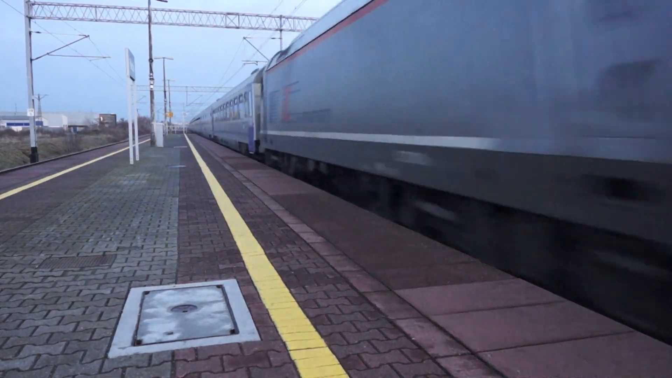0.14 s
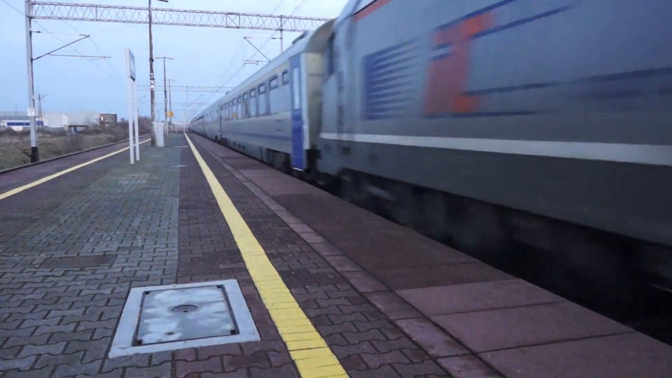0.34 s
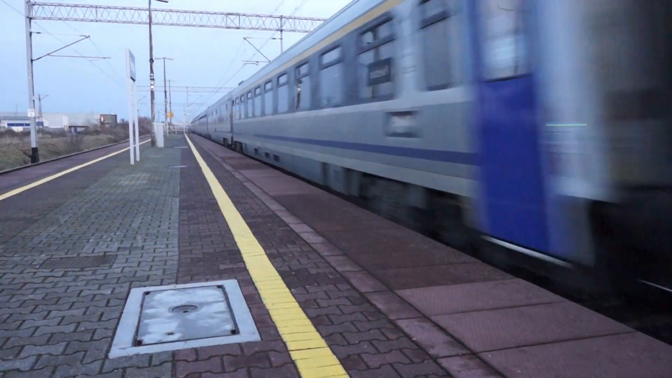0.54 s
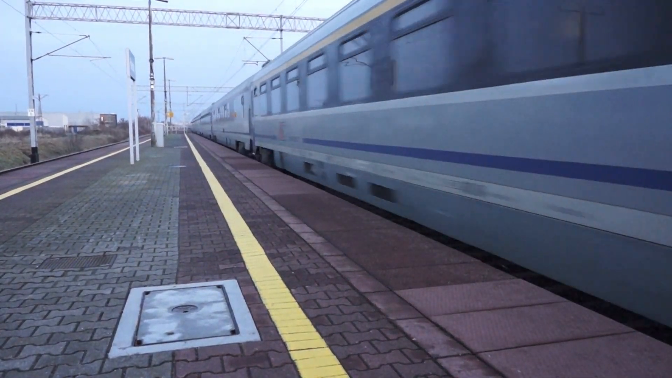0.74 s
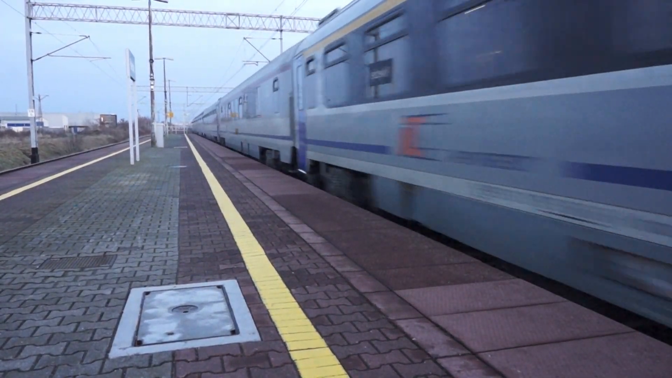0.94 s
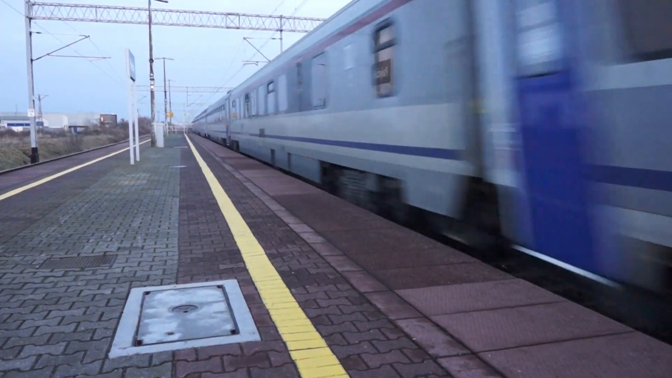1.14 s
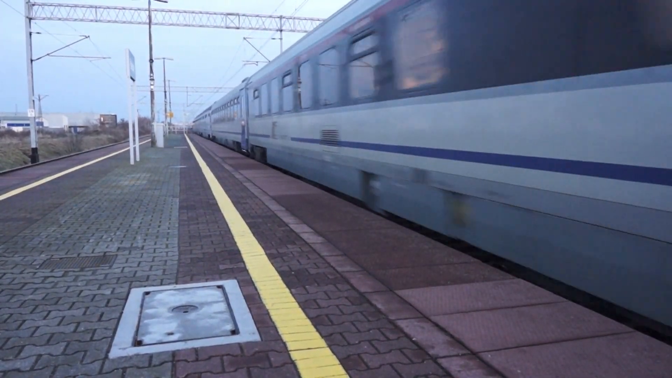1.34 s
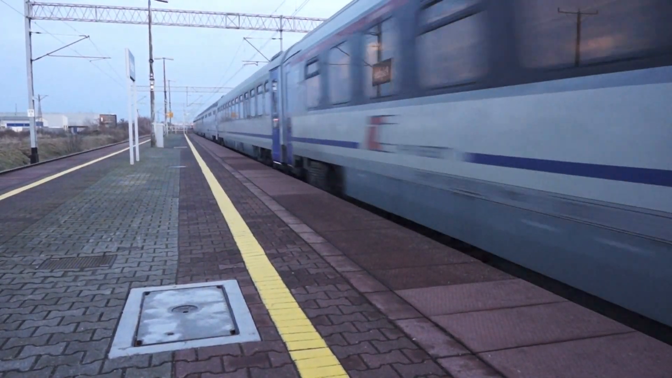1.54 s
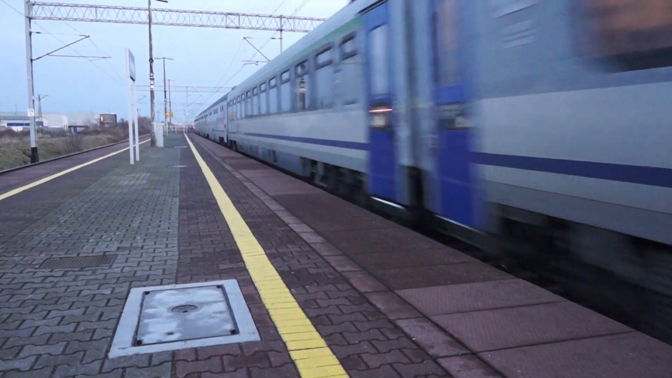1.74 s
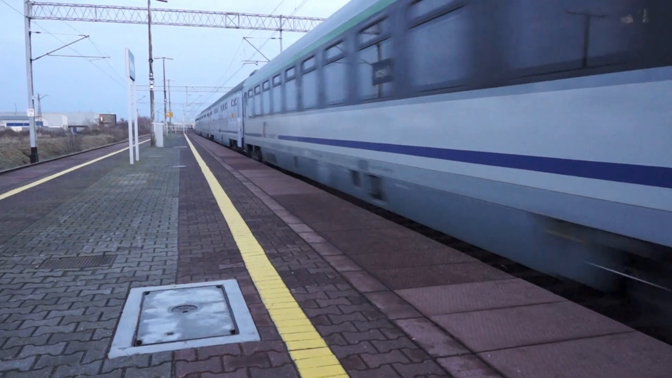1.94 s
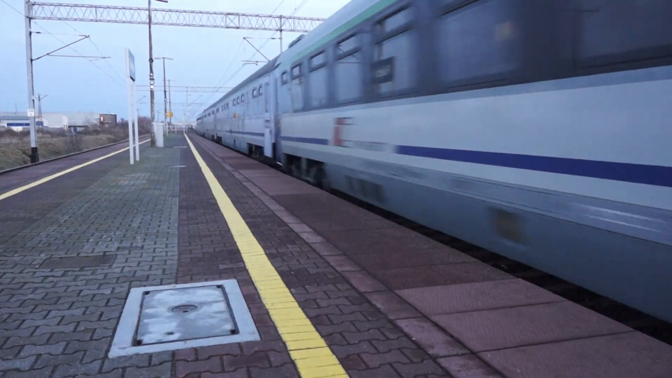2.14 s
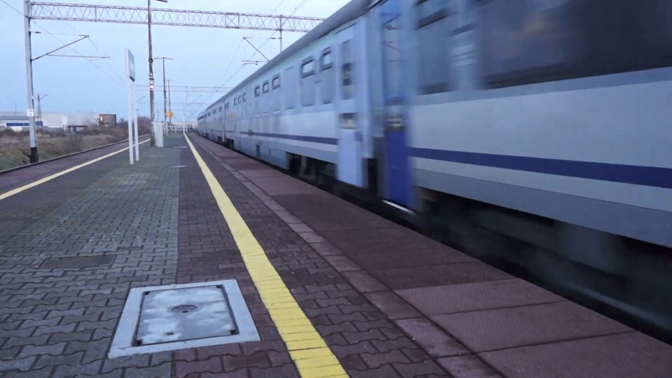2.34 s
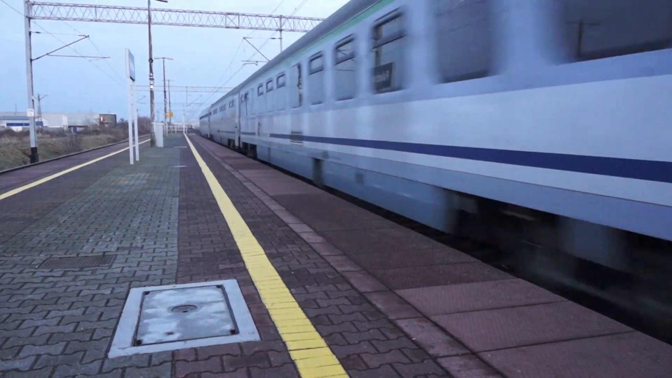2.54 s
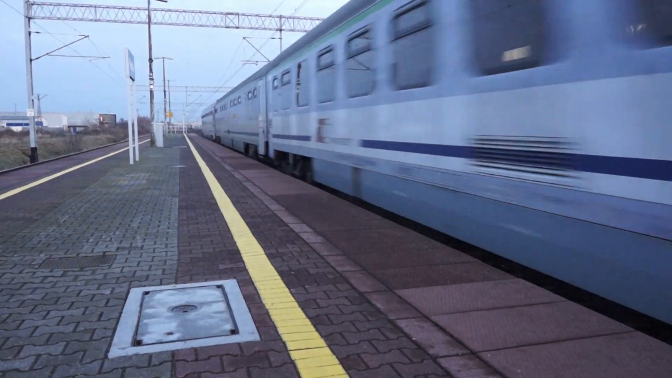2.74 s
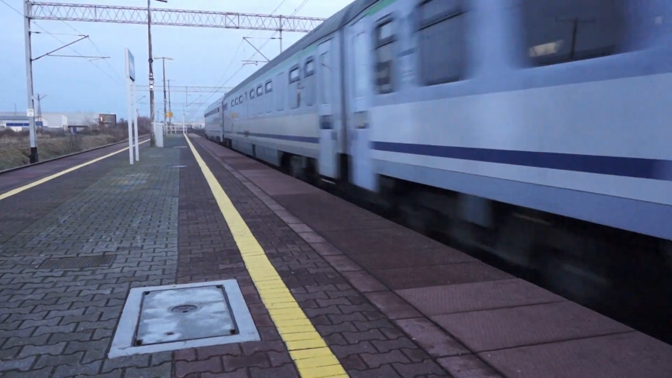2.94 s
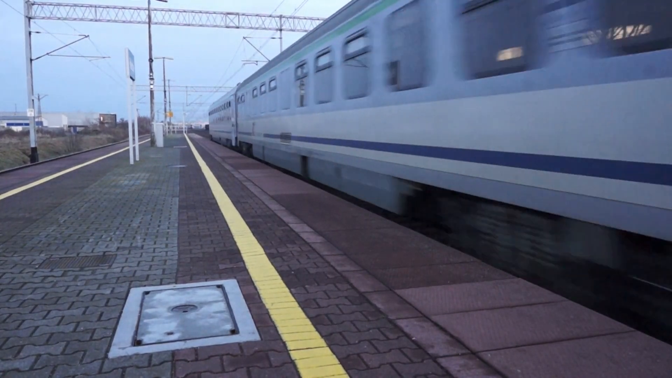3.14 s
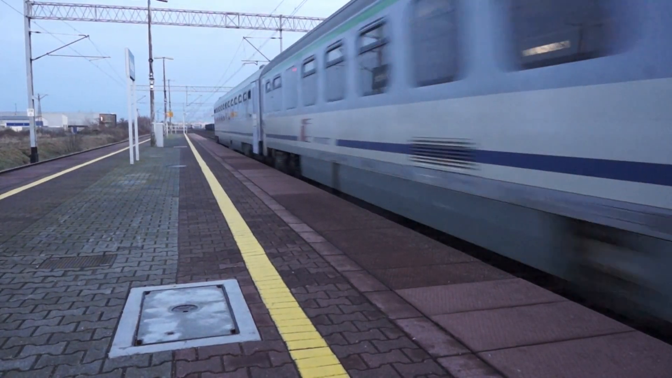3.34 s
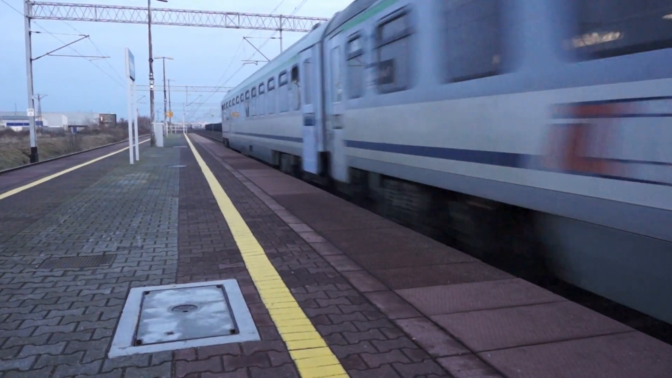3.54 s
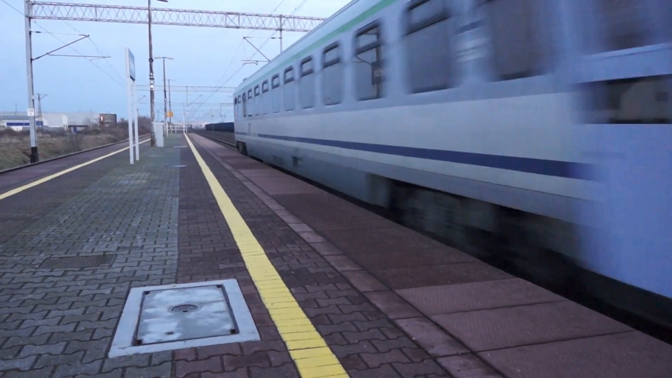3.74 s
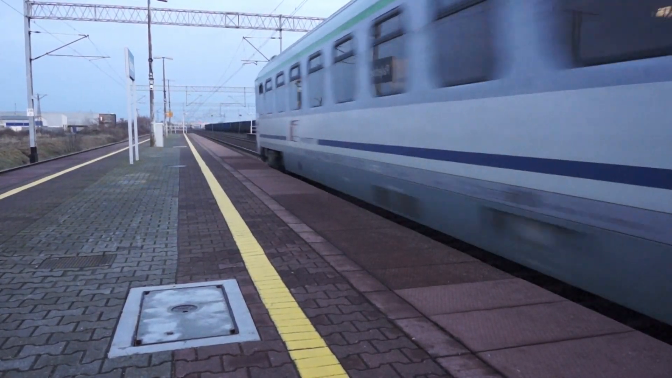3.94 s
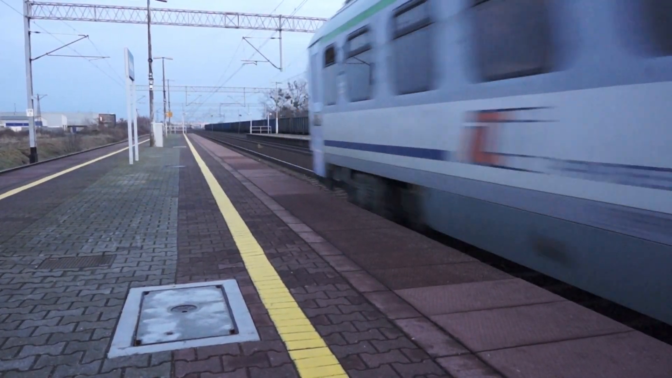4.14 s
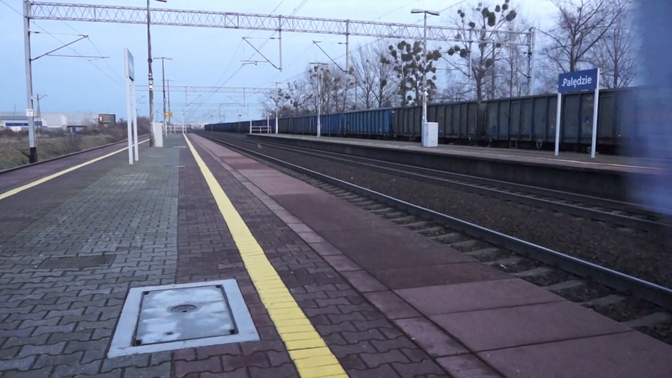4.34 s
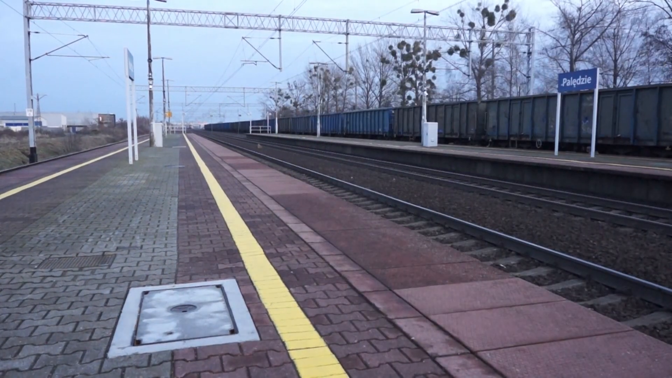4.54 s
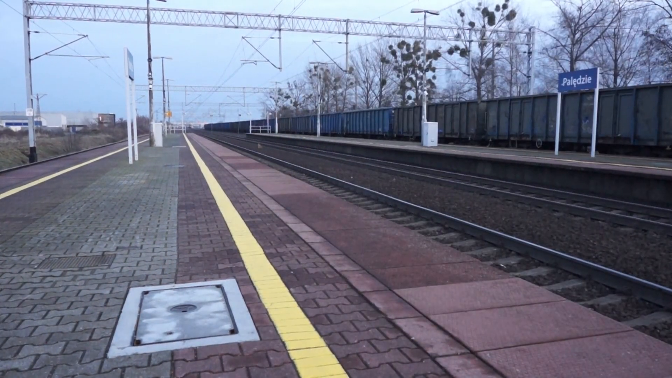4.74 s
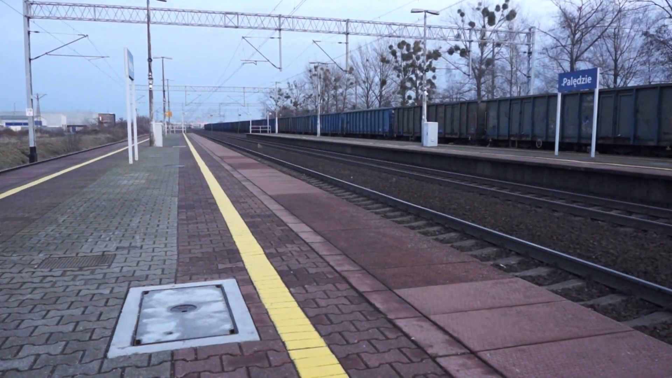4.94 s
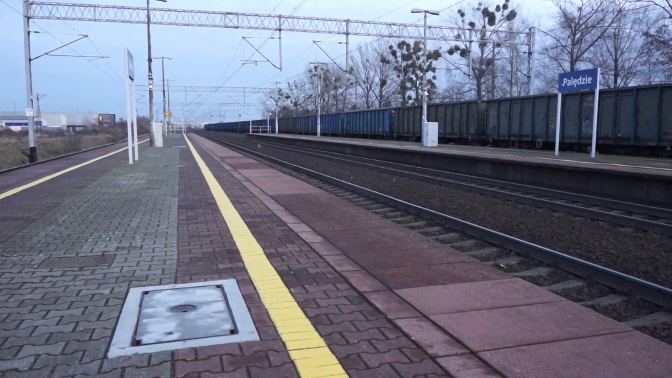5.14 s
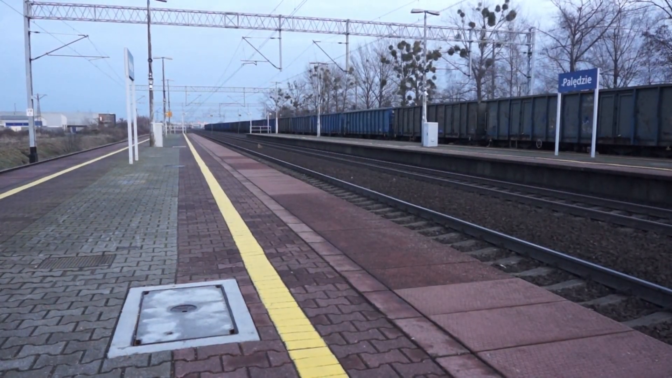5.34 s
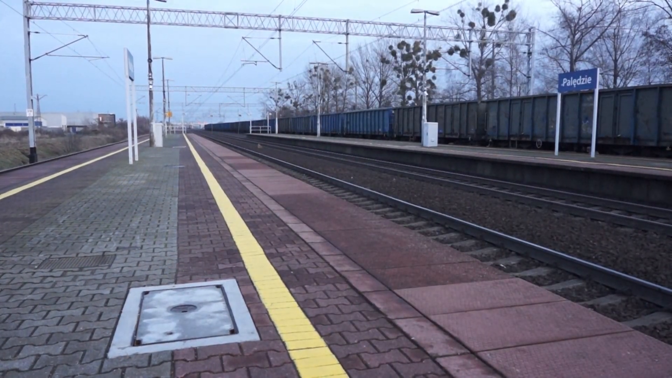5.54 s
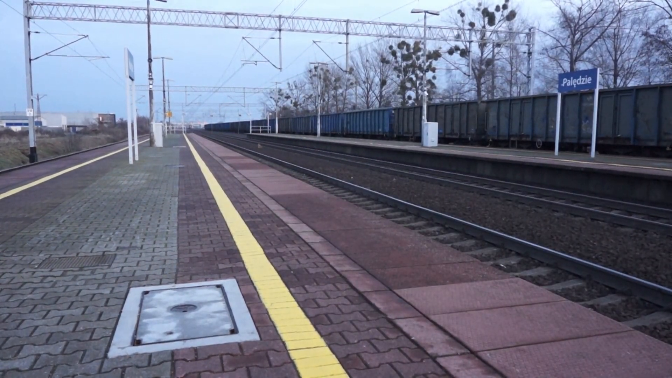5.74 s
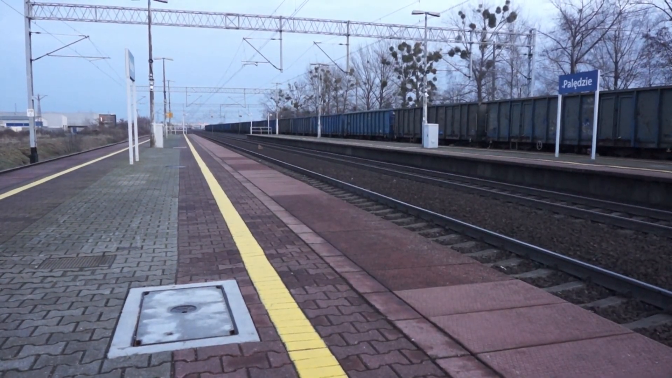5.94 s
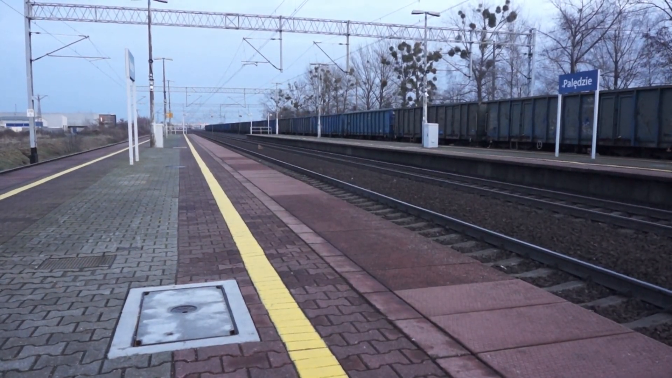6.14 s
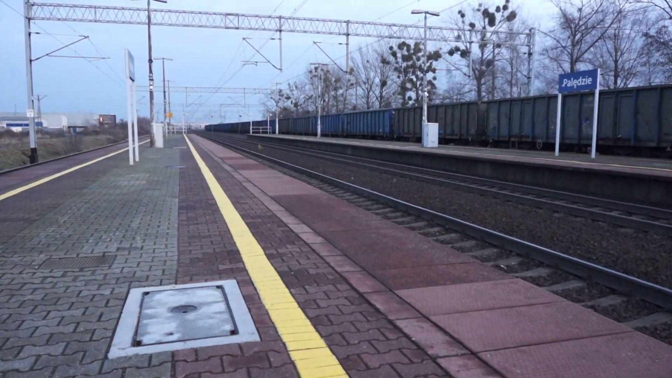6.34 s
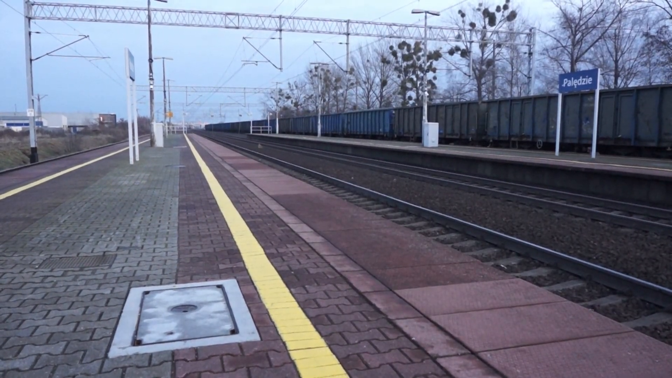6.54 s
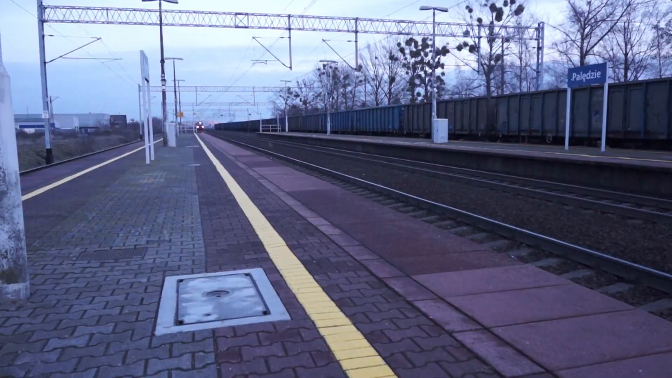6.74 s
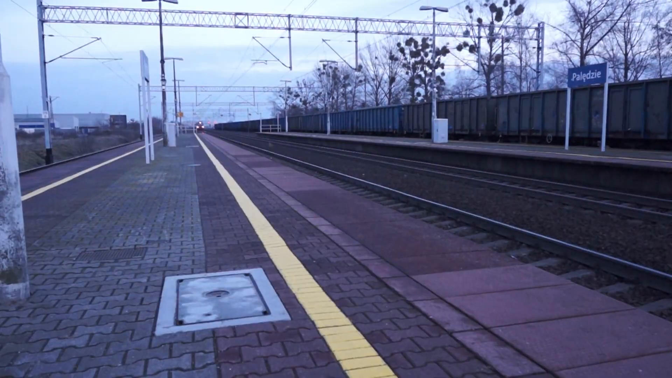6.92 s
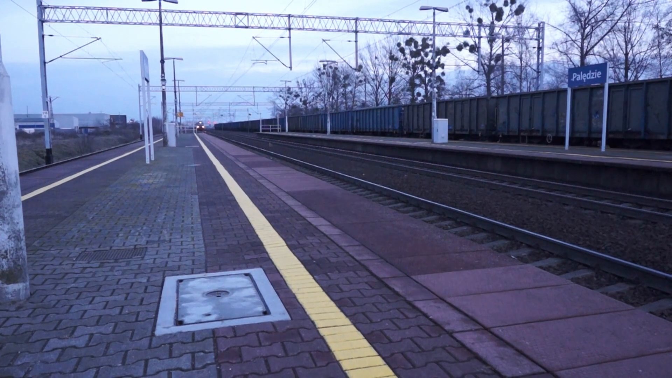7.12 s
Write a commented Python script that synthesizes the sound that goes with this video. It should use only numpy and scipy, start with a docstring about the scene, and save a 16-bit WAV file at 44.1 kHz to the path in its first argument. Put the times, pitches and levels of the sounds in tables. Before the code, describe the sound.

Express train rushes by at close range with pulsing rumble, hiss and falling wheel whine, followed by wind thumps and a faint distant train.

```python
"""Express train passing a platform

An electric express rushes past a few metres away at about 150 km/h: each bogie brings a surge of
rumble, roar and hiss (shaped noise), and ringing wheels (resonances) slide down in pitch.
Bow wave and wake buffet the microphone (noise gusts, filtered pops); the rails sing as the train recedes.
After a quick fade the same platform is heard with a far-off train, soft hiss and a light breeze (noise)."""
import sys
import numpy as np
from scipy import signal
from scipy.fft import rfft, irfft
from scipy.io import wavfile

SR = 44100
rng = np.random.default_rng(int(sys.argv[2]) if len(sys.argv) > 2 else 0)


def materialize(psi):
    """Save the field psi as 16-bit PCM at rate SR to the path in sys.argv[1].

    A 1-D psi becomes a single channel; in a 2-D psi each row is a channel.
    """
    bounded = np.clip(np.atleast_2d(psi).T, -1, 1)
    quanta = np.round(bounded * 32767).astype(np.int16)
    wavfile.write(sys.argv[1], SR, quanta)


N = 321048
TIME = np.arange(N) / SR
STEPS = TIME[::32]  # coarser times for slow gains
FREQS = np.maximum(np.fft.rfftfreq(N, 1 / SR), 1)
MACH = .12  # train speed / sound speed
TRACK_DISTANCE_S = .119  # distance to the track in seconds of travel


# noise colour with the train near: (frequency [Hz], relative density [dB per Hz])
NEAR_COLOUR = [(30, -43), (100, -24), (180, -14), (253, -6), (333, -7), (777, -1.5), (1200, -5.5),
               (1680, 0.5), (2200, -1.5), (3140, -9.5), (4030, -18), (8300, -18.5), (11200, -32.5),
               (15500, -62)]
# noise colour with the train gone by: (frequency [Hz], relative density [dB per Hz])
FAR_COLOUR = [(40, -37), (90, -19), (220, 2.5), (330, 4), (500, 3.5), (800, 3.5), (1900, 4.5), (3000, -4.5),
              (4000, -14), (5400, -10.5), (6500, -12), (8500, -2.5), (11000, -17.5), (15000, -66)]
# stereo picture: (frequency [Hz], left-right likeness [0-1], left minus right [dB], lag of left [rad])
TRAIN_IMAGE = [(200, .94, -.3, 0), (750, .96, -2.5, 0), (1550, .56, -8, .1), (3000, .25, -7.3, .1),
               (4200, .38, -3.6, 3.1), (6300, .3, -2.7, 4.3), (8000, .5, -2.3, 6.2), (14000, .2, -2, 6.6)]
# bogies, the locomotive's first: (time abreast [s], rumble [dB], roar [dB], hiss [dB])
BOGIES = [(0.047, -24, -23.5, -20), (0.425, -23, -25, -23.5), (0.576, -25, -24, -22.5),
          (0.742, -45, -24.5, -27.5), (1.179, -30.5, -24.5, -24), (1.393, -30, -21, -28),
          (1.847, -26, -22.5, -23.5), (2.057, -28, -22.5, -26.5), (2.401, -27, -24, -26.5),
          (2.643, -26.5, -29.5, -25), (3.077, -30, -24.5, -26.5), (3.281, -27, -23.5, -24.5),
          (3.732, -27.5, -27.5, -23), (3.89, -25, -20, -28.5), (4.355, -25, -24.5, -27)]


def rolling(low_split_hz=1050, high_split_hz=3800, dulling_from_s=4.32, dulling_s=.82,
            rumble_throb_db=1.4, roar_flutter_db=1.45, hiss_rasp_db=1.08,
            air_loss_db_per_s=8.5, air_loss_above_hz=7400):
    """Rough steel on steel: track rumbles, rails and wheels roar, contact hisses; air dulls it receding."""
    _, rumble_db, roar_db, hiss_db = np.transpose(BOGIES)
    since_s = np.maximum(TIME - dulling_from_s, 0)
    gone = np.minimum(since_s / dulling_s, 1)
    jolt = knocks()
    # track level [dB], falloff exponent
    rumble_gain = jolt * train_gain(rumble_db, -32, 1) * from_db(rumble_throb_db * drift(22))
    roar_gain = jolt * train_gain(roar_db, -33, .57) * from_db(roar_flutter_db * drift(31))
    hiss_gain = np.sqrt(jolt) * train_gain(hiss_db, -43, 1) * from_db(hiss_rasp_db * drift(16))
    out = 0
    for colour, share in (NEAR_COLOUR, 1 - gone), (FAR_COLOUR, gone):
        noise = stereo_spectrum(colour, TRAIN_IMAGE)
        rumble = rumble_gain * band(noise, high_hz=low_split_hz)
        roar = roar_gain * band(noise, low_split_hz, high_split_hz)
        hiss = hiss_gain * band(noise, low_hz=high_split_hz)
        out = out + np.sqrt(share) * (rumble + roar + hiss)
    top = irfft(rfft(out) / (1 + (air_loss_above_hz / FREQS) ** 20), N)
    return out - top * (1 - from_db(-air_loss_db_per_s * since_s))


def train_gain(bogie_db, track_db, track_falloff, facing_s=.11, bogie_falloff=2.89, track_reach_s=.38):
    """Bogies peak abreast and drop off steeply; the track holds its level until the last one has left."""
    times = np.array(BOGIES)[:, 0]
    bogie_power = sum(from_db(db) ** 2 / (1 + np.abs((STEPS - s) / facing_s) ** bogie_falloff)
                      for s, db in zip(times, bogie_db))
    behind = np.hypot(1, np.maximum(STEPS - times[-1], 0) / track_reach_s)
    track = from_db(track_db) * behind ** -track_falloff
    return np.interp(TIME, STEPS, np.sqrt(bogie_power + track ** 2))


# wheels knocking on the rail: (time [s], level jump [dB], rise [s])
KNOCKS = [(0.35, 2.5, 0.014), (1.975, 5, 0.0052), (2.344, 4.5, 0.0055), (2.985, 1.5, 0.008),
          (3.595, 3.5, 0.026), (4.014, 4.5, 0.021)]


def knocks():
    """Gain: each knock shakes the track harder for a few hundredths of a second."""
    return jolts(KNOCKS)


# upper wheel modes at rest: (frequency [Hz], width [Hz], relative level [dB])
WHEEL_MODES = [(2230, 50, -5), (2520, 50, -2), (2870, 60, -3), (3290, 120, -2), (5700, 200, -10),
               (7900, 260, -10)]
# ringing wheels: (time abreast [s], main mode [dB], upper modes [dB])
RINGS = [(0.76, -23, -29), (1.21, -28.5, -26), (1.41, -24.5, -25.5), (1.87, -24, -25), (2.0, -21.5, -26),
         (2.47, -21.5, -27), (2.64, -30, -37), (3.059, -21, -26.5), (3.31, -23.5, -30), (3.74, -30, -27),
         (3.92, -23.5, -28), (4.375, -28.5, -42)]


def wheels(main_hz=1740, throb_db=1.5, turns_hz=13, balance_db=-7, falloff=1.45):
    """Wheels whine in the main mode and ring in upper ones; passing bends and swells, each turn throbs."""
    shape = sum(from_db(db) * resonance(hz, width_hz) for hz, width_hz, db in WHEEL_MODES)
    upper = rms_one(irfft(white(1)[0] * shape, N))
    out = np.zeros((2, N))
    for abreast, main_db, upper_db in RINGS:
        near = np.abs(TIME - abreast) < 1
        time = TIME[near]
        main = whine(main_hz, abreast, time)
        ring = doppler(np.roll(upper, rng.integers(N)), abreast)[near] * pan(balance_db)
        sound = from_db(main_db) * main + from_db(upper_db) * ring
        throb = from_db(throb_db * np.sin(2 * np.pi * (turns_hz * time + rng.random())))
        out[:, near] += sound * throb * distance(abreast, time) ** -falloff
    return out


def whine(hz, abreast, time, width_hz=105, evenness=.45):
    """A wheel mode driven by the rough rail: an unsteady tone that falls in pitch as it passes."""
    pole = np.exp(-np.pi * width_hz / SR)
    run_in = SR // 20
    noise = rng.standard_normal((2, 2, len(time) + run_in))
    slow = signal.lfilter([(1 - pole) ** 2], [1, -2 * pole, pole ** 2], noise)
    real, imaginary = slow[..., run_in:]
    direct, scattered = real + 1j * imaginary
    alike, balance_db = train_image(hz)
    motion = np.array([direct, alike * direct + np.sqrt(1 - alike ** 2) * scattered])
    motion = motion / np.abs(motion) ** evenness  # 0 = noise, 1 = constant strength
    carrier = np.exp(2j * np.pi * hz * emitted(abreast, time))
    return rms_one(np.real(motion * carrier) * pan(balance_db))


def train_image(hz):
    """Left-right likeness and level difference of the train at one frequency."""
    at_hz, alike, balance_db, _ = np.transpose(TRAIN_IMAGE)
    return np.interp(hz, at_hz, alike), np.interp(hz, at_hz, balance_db)


# wheel modes standing out: (time [s], frequency [Hz], level [dB], spread [s])
FLARES = [(0.781, 3230, -25, 0.034), (1.255, 2850, -23, .015), (1.789, 1940, -22, .025),
          (1.89, 2760, -22, .02), (2.01, 697.6, -21, 0.057), (2.134, 625, -20.5, .017),
          (2.37, 2570, -22.5, .022), (2.41, 778, -24, 0.093), (2.996, 742, -18.5, .01),
          (3.016, 2470, -21, .022), (3.06, 737, -23.5, .04), (3.131, 636, -19, .014),
          (3.22, 1556, -21.5, 0.049), (3.33, 2840, -24, .03), (3.669, 1930, -25, .035),
          (4.384, 1670, -19.5, .028)]


def flares():
    """One mode of a ringing wheel stands out briefly as a short falling howl or squeal."""
    out = np.zeros((2, N))
    for s, hz, db, spread_s in FLARES:
        near = np.abs(TIME - s) < 4 * spread_s
        time = TIME[near]
        out[:, near] += from_db(db) * bell(s, spread_s, time) * whine(hz, s, time)
    return out


def flange(abreast=2.65, hz=9000, width_hz=400, level_db=-35, falloff=1.7, balance_db=-3):
    """One flange squeals, faint and high, sliding down as its wheel goes by."""
    squeal = rms_one(irfft(white(1)[0] * resonance(hz, width_hz), N))
    passing = doppler(squeal, abreast) * distance(abreast) ** -falloff
    return from_db(level_db) * passing * pan(balance_db)


# singing track: (frequency [Hz], width [Hz], level [dB], time strongest [s], spread [s])
RAIL_SONG = [(810, 120, -31.5, 4.79, .11), (1615, 90, -39.5, 5.15, .65), (2080, 90, -45, 5.6, 1.0),
             (7690, 420, -57, 5.4, 1.3), (9590, 120, -62, 5.9, 1.3)]


def rail_song(waver_db=1.8, balance_db=-4):
    """Narrow resonances carry along the rails after the train has gone by; each wavers on its own."""
    out = 0
    for hz, width_hz, db, strongest, spread_s in RAIL_SONG:
        tone = rms_one(irfft(white(1)[0] * resonance(hz, width_hz), N))
        out = out + tone * from_db(db + waver_db * drift(17)) * bell(strongest, spread_s)
    return out * pan(balance_db)


# gusts on the microphone from bow wave, wake and later breeze: (time [s], level [dB], spread [s])
GUSTS = [(.04, -21, 0.1), (.2, -21, 0.11), (.5, -27, 0.1), (4.53, -18.5, 0.0046), (4.55, -21.5, 0.018),
         (4.605, -23.5, 0.0062), (4.65, -28, 0.063), (5.99, -37.5, 0.086), (6.21, -36.5, 0.11),
         (6.313, -27, 0.026), (6.351, -22, 0.012), (6.408, -23.5, 0.026), (6.5, -32.5, 0.072),
         (7.03, -39, .02), (7.115, -23.5, 0.018), (7.18, -31, 0.028), (7.262, -20, 0.012)]
# turbulence colour: (frequency [Hz], relative density [dB per Hz])
WIND_COLOUR = [(30, -35), (80, -20), (200, -4.5), (320, -1.5), (450, -2), (750, 0), (950, -2.5),
               (1130, -.5), (1450, -8), (2200, -18), (4000, -40), (9000, -64)]
# stereo picture: (frequency [Hz], left-right likeness [0-1], left minus right [dB], lag of left [rad])
WIND_IMAGE = [(150, 0.89, -0.35, 0), (1000, 0.58, -0.92, 0)]


def slipstream(lumpy_db=.5, split_hz=500, bright_db=1.5, brightening_db_per_db=.6, strong_db=-20):
    """Turbulence on the microphone comes in lumps; strong ones are brighter, weak ones stay dull."""
    gust_db = 20 * np.log10(swells(GUSTS)) + lumpy_db * np.tanh(drift(68))
    noise = stereo_spectrum(WIND_COLOUR, WIND_IMAGE)
    top_db = bright_db + np.clip(brightening_db_per_db * (gust_db - strong_db), -8, 2)
    low = band(noise, high_hz=split_hz)
    top = from_db(top_db) * band(noise, low_hz=split_hz)
    return from_db(gust_db) * (low + top)


# single eddies slapping the microphone: (time [s], mean peak level [dB], top of the pop [Hz])
EDDIES = [(4.527, -5, 2600), (4.533, -6, 900), (4.546, -8, 800), (4.555, -7, 800), (4.58, -12.5, 600),
          (4.607, -9, 1000), (4.669, -14, 1100), (5.949, -19, 750), (6.041, -13, 700), (6.306, -12, 600),
          (6.319, -13, 800), (6.342, -10, 650), (6.353, -10, 1400), (6.373, -11, 1200), (6.392, -8, 1000),
          (6.397, -2.5, 1400), (6.407, -7, 1400), (6.417, -5.5, 1200), (6.496, -18, 700)]


def eddies(uneven_db=.8, low_share=.27):
    """A sudden pressure step leaves a short dull pop, a little different in level on each side."""
    out = np.zeros((2, N))
    for s, db, top_hz in EDDIES:
        highpass = signal.butter(2, low_share * top_hz, "high", fs=SR, output="sos")
        lowpass = signal.butter(6, top_hz, fs=SR, output="sos")
        pop = signal.sosfilt(np.vstack([highpass, lowpass]), signal.unit_impulse(SR // 20))
        pop = pop / np.abs(pop).max()
        sides = from_db(db + uneven_db * rng.standard_normal(2))
        start = round(s * SR)
        out[:, start:start + len(pop)] += np.outer(sides, pop)
    return out


# far train and hiss colour: (frequency [Hz], relative density [dB per Hz])
LATER_COLOUR = [(30, -29), (120, -7), (300, -0.5), (550, 4.5), (1100, 3.5), (1420, 7), (1650, 2),
                (2500, -4), (4000, -5.5), (8000, -1.5), (10000, -9), (15500, -34)]
# stereo picture: (frequency [Hz], left-right likeness [0-1], left minus right [dB], lag of left [rad])
LATER_IMAGE = [(200, 1, -1, 0), (800, 0.92, 0.094, 0), (12000, 0.52, -1.4, 0)]
# breeze colour: (frequency [Hz], relative density [dB per Hz])
BREEZE_COLOUR = [(25, -42), (70, -16), (130, 1), (210, -1.5), (290, -9.5), (500, -30), (2000, -83)]
# swells of soft hiss: (time [s], level [dB], spread [s])
HISS_SWELLS = [(6.78, -34, 0.068), (7.05, -36.5, 0.099)]


def later_platform(far_train_db=-35.5, steady_hiss_db=-46, split_hz=3000, lumpy_db=2.5):
    """A distant train murmurs, a soft hiss swells twice, and a breeze thumps on the microphone."""
    noise = stereo_spectrum(LATER_COLOUR, LATER_IMAGE)
    far_train = from_db(far_train_db) * band(noise, high_hz=split_hz)
    hiss_gain = np.hypot(from_db(steady_hiss_db), swells(HISS_SWELLS))
    hiss = hiss_gain * band(noise, low_hz=split_hz)
    thumps = band(stereo_spectrum(BREEZE_COLOUR, WIND_IMAGE))
    breeze = swells(GUSTS) * from_db(lumpy_db * drift(40)) * thumps
    return far_train + hiss + breeze


def emitted(abreast, time=TIME):
    """When the sound arriving now left a point on the train, up to a constant delay."""
    return time - MACH * TRACK_DISTANCE_S * distance(abreast, time)


def distance(abreast, time=TIME):
    """Distance of a point on the train, in units of its closest approach."""
    return np.sqrt(1 + ((time - abreast) / TRACK_DISTANCE_S) ** 2)


def doppler(sound, abreast):
    """A sound carried past on the train: its changing travel time bends the pitch down."""
    return np.interp((emitted(abreast) * SR) % N, np.arange(N), sound)


def resonance(hz, width_hz):
    """Amplitude response of a doubled resonance: steep skirts, same power at any width."""
    return 1 / (1 + ((FREQS - hz) / (.75 * width_hz)) ** 2) / np.sqrt(width_hz)


def bell(s, spread_s, time=TIME):
    """A smooth rise and fall of height 1 around a moment."""
    return np.exp(-.5 * ((time - s) / spread_s) ** 2)


def swells(rows):
    """Joint gain of swells (time [s], level [dB], spread [s]), added in power."""
    power = sum((from_db(db) * bell(s, spread_s, STEPS)) ** 2 for s, db, spread_s in rows)
    return np.interp(TIME, STEPS, np.sqrt(power + 1e-12))


def jolts(rows):
    """Joint gain of quick level changes (time [s], level [dB], rise [s]) that ebb more slowly."""
    total_db = 0
    for s, db, rise_s in rows:
        age = np.clip((STEPS - s) / rise_s, 0, 20)
        total_db = total_db + db * age * np.exp(1 - age)
    return np.interp(TIME, STEPS, from_db(total_db))


def drift(rate_hz):
    """Smooth random wandering of rms 1."""
    return rms_one(irfft(white(1)[0] / (1 + (FREQS / rate_hz) ** 2), N))


def white(count):
    """Spectra of unrelated white noises."""
    shape = (count, len(FREQS))
    return rng.standard_normal(shape) + 1j * rng.standard_normal(shape)


def stereo_spectrum(colour, image):
    """Left and right noise spectra with a given colour, likeness, balance and lag."""
    alike, balance_db, lag = in_frequency(image)
    alike = np.clip(alike, 0, .99)
    mid, side = white(2)
    pair = np.sqrt(1 + alike) * mid + np.sqrt(1 - alike) * side * [[1], [-1]]
    left, right = pair * pan(balance_db)
    lagged = np.array([left * np.exp(-1j * lag), right])
    # level the mid signal, so that likeness and lag leave the colour alone
    return lagged * from_db(in_frequency(colour)[0]) / np.sqrt(1 + alike * np.cos(lag))


def in_frequency(rows):
    """Each column of a spectrum table at every frequency."""
    hz, *columns = np.transpose(rows)
    return [np.interp(np.log(FREQS), np.log(hz), column) for column in columns]


def band(spectrum, low_hz=1, high_hz=SR):
    """One band of a spectrum as sound of rms 1."""
    gain = ((1 + (low_hz / FREQS) ** 10) * (1 + (FREQS / high_hz) ** 10)) ** -.5
    return rms_one(irfft(spectrum * gain, N))


def pan(balance_db):
    """Left and right gains for a left minus right level."""
    return from_db(np.array([[.5], [-.5]]) * balance_db)


def rms_one(x):
    """Scale so that the middle of the stereo picture has rms 1."""
    mid = np.atleast_2d(x).mean(axis=0)
    return x / np.sqrt(np.mean(mid ** 2) + 1e-20)


def from_db(db):
    """Decibels to gain."""
    return 10 ** (np.asarray(db) / 20)


CUT_S = 6.623  # the passing ends, the later platform begins


def scene():
    """The passing train, then the quiet platform."""
    train = rolling() + wheels() + flares() + flange() + rail_song()
    passing = train + slipstream() + eddies()
    return np.where(TIME < CUT_S, passing, later_platform())


# brief dips of the level: (time [s], level [dB], fall [s])
DIPS = [(0.297, -7.5, 0.0079), (3.96, -1.5, 0.021), (4.52, -3, 0.021)]


def record(dry, fade_s=.034, ceiling=.95, cutoff_hz=15600):
    """Brief dips, a quick fade out and in between the two moments, rounded peaks and a top cut."""
    fade = np.minimum(np.abs(TIME - CUT_S) / fade_s, 1) ** 1.76
    sound = dry * jolts(DIPS) * fade
    sound = sound / (1 + (sound / ceiling) ** 10) ** (1 / 10)
    lowpass = signal.ellip(10, .1, 80, cutoff_hz, fs=SR, output="sos")  # ripple, stopband [dB]
    return signal.sosfilt(lowpass, sound)


dry = scene()
out = record(dry)
materialize(out)
```